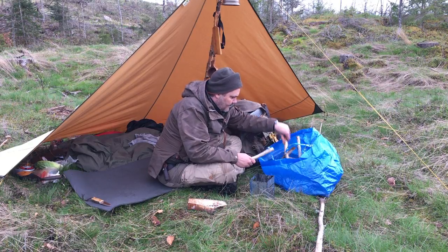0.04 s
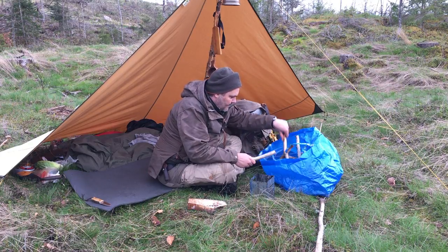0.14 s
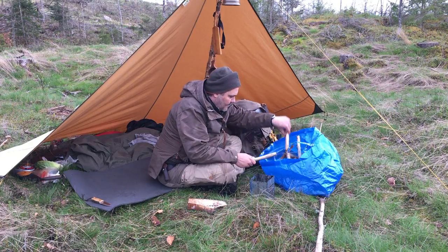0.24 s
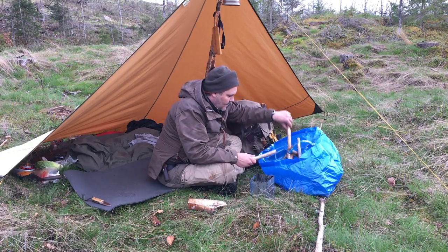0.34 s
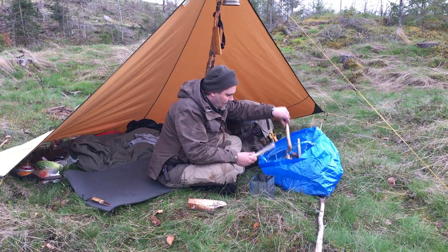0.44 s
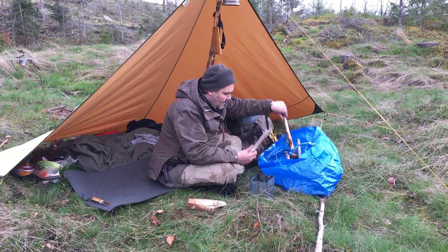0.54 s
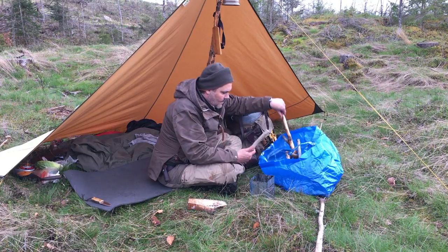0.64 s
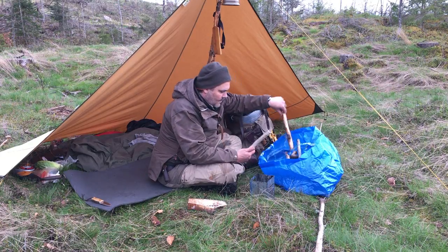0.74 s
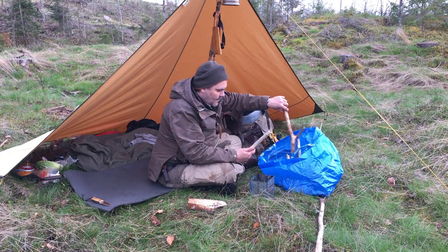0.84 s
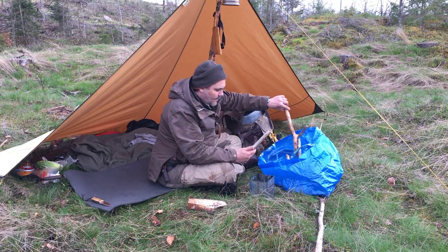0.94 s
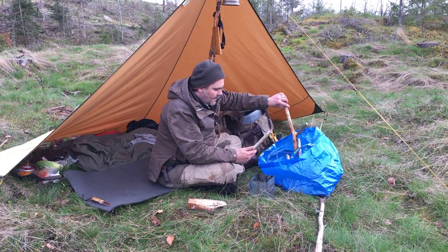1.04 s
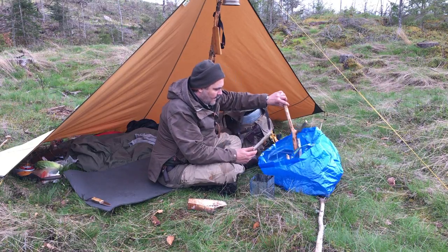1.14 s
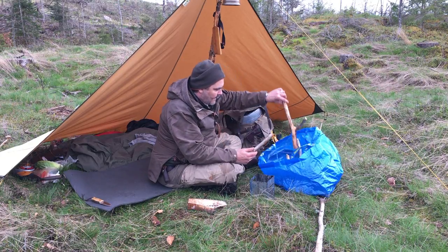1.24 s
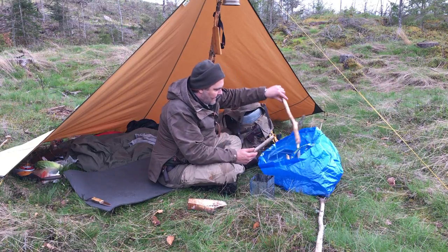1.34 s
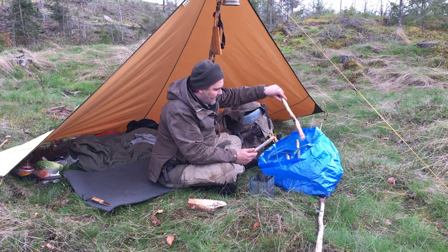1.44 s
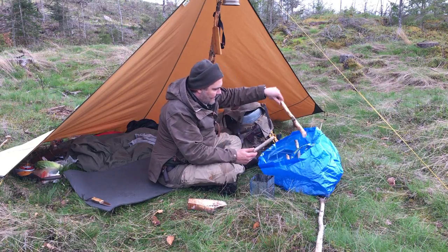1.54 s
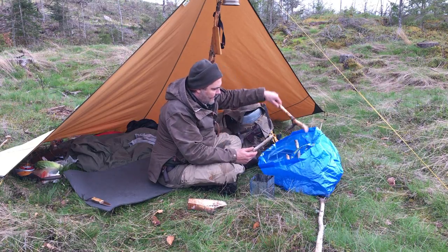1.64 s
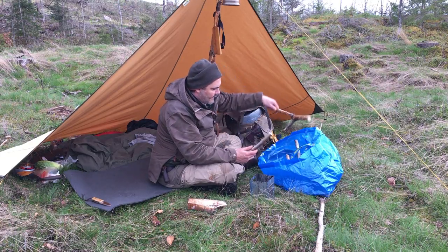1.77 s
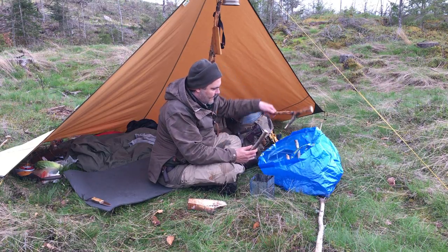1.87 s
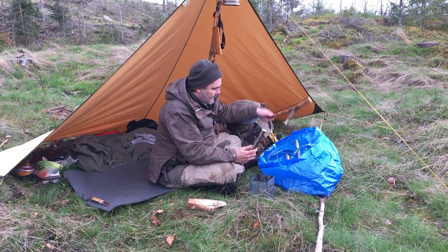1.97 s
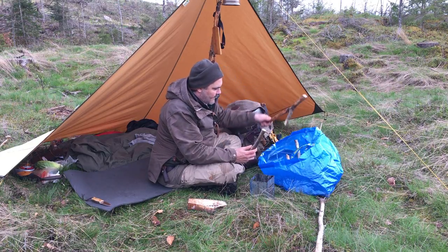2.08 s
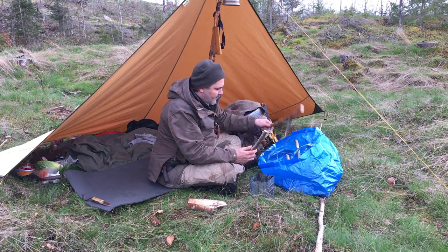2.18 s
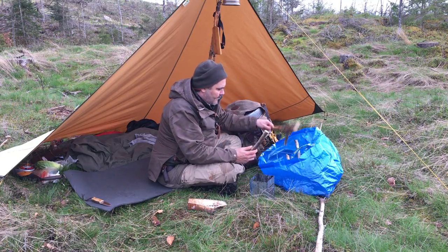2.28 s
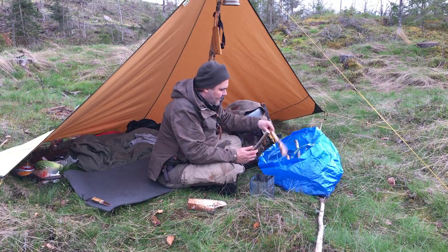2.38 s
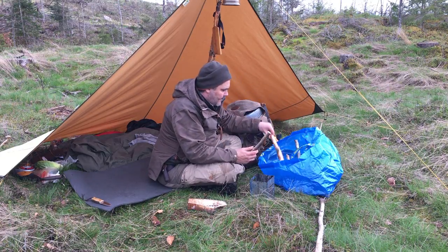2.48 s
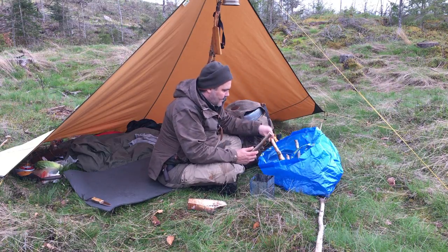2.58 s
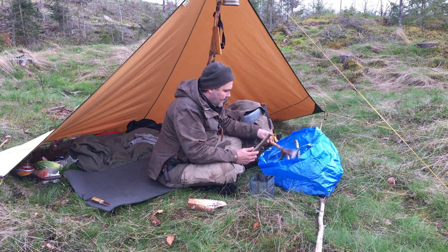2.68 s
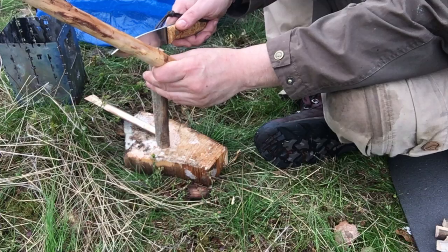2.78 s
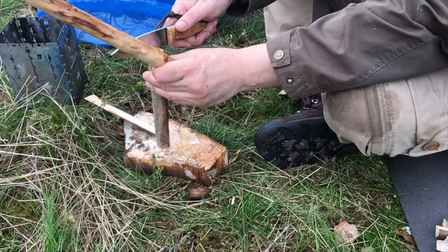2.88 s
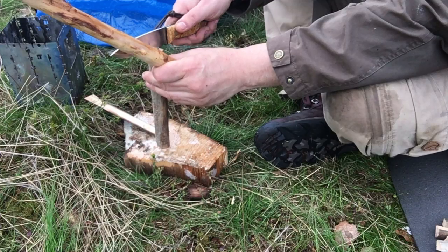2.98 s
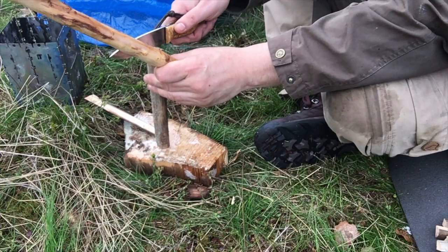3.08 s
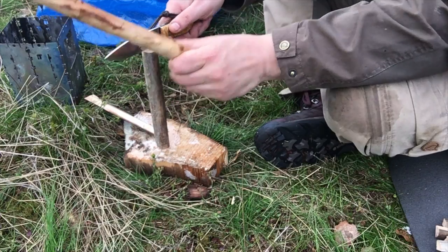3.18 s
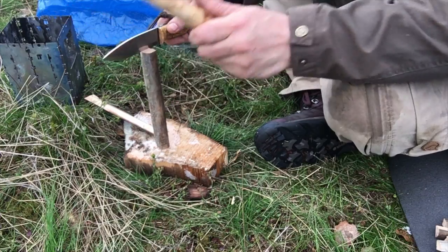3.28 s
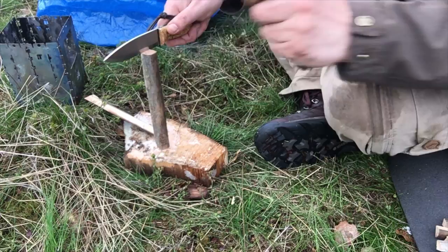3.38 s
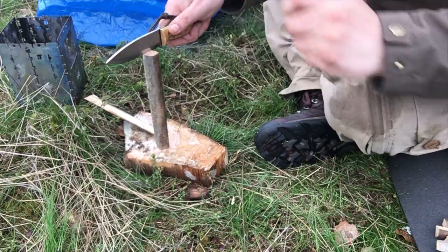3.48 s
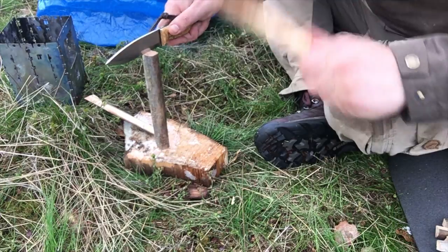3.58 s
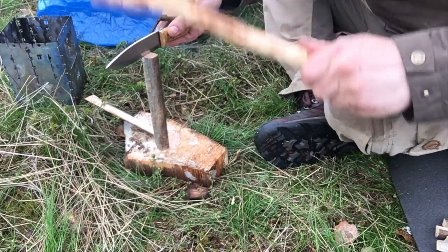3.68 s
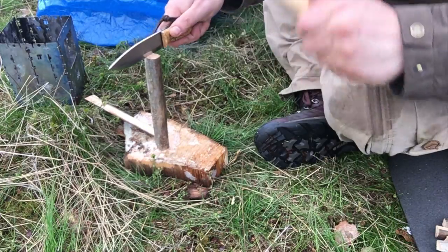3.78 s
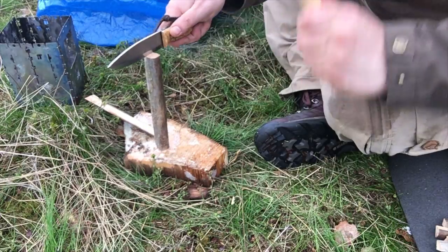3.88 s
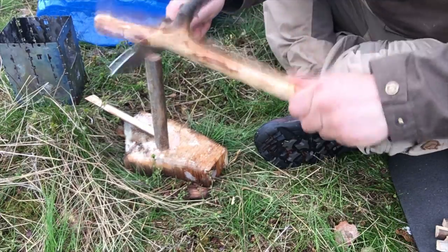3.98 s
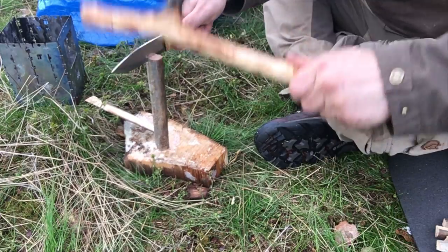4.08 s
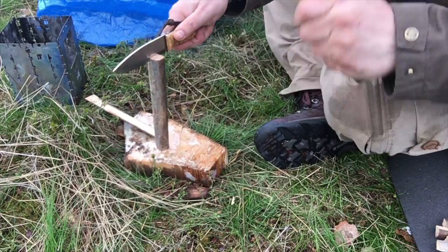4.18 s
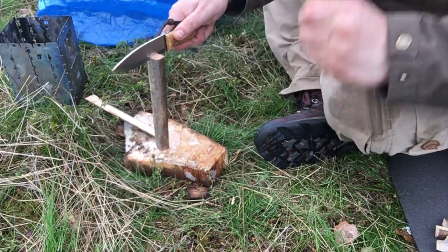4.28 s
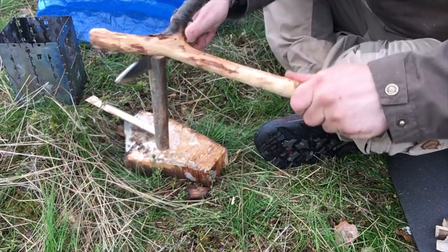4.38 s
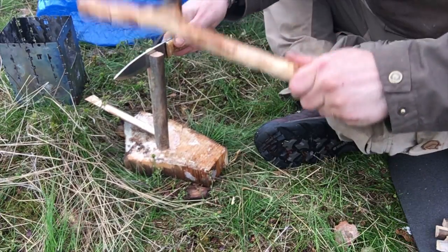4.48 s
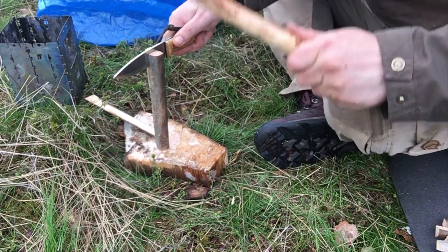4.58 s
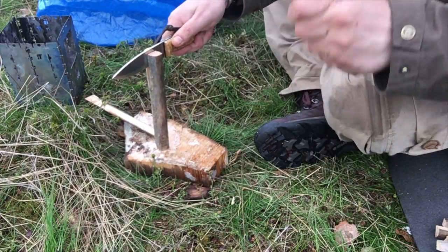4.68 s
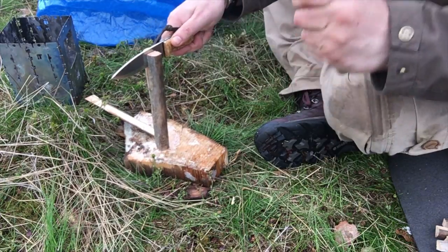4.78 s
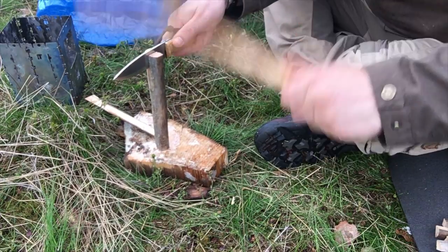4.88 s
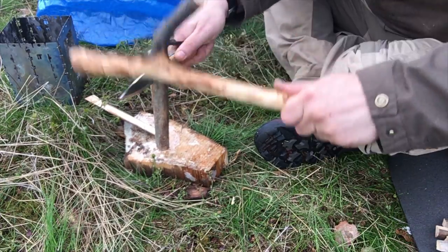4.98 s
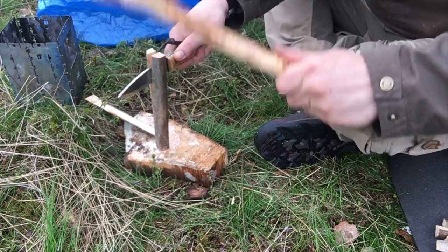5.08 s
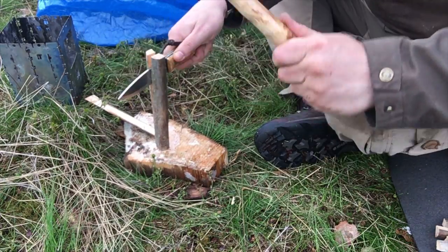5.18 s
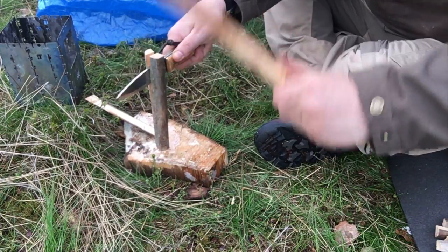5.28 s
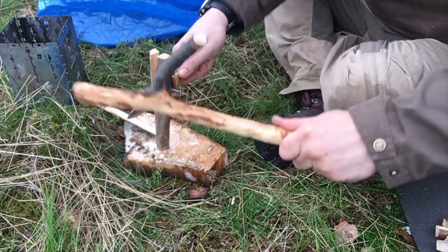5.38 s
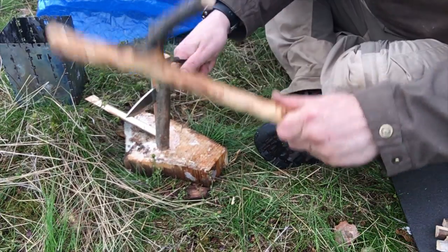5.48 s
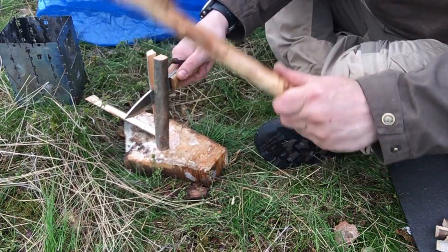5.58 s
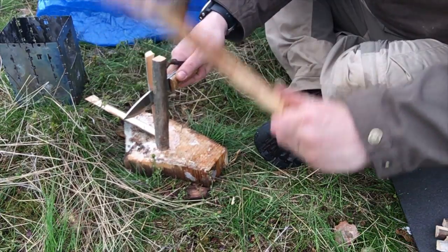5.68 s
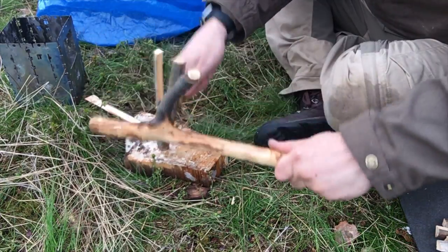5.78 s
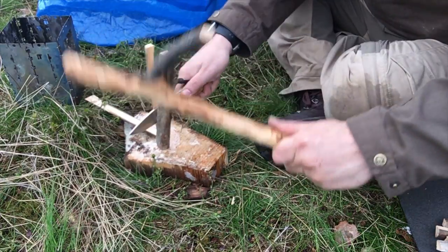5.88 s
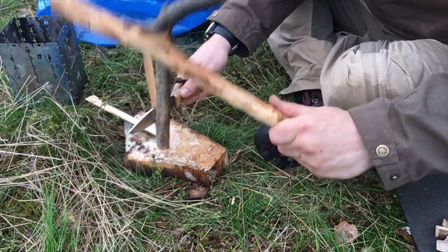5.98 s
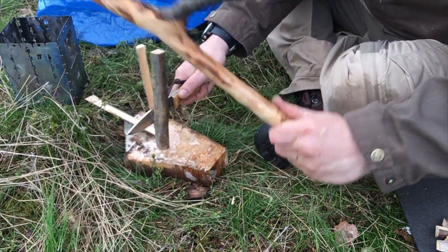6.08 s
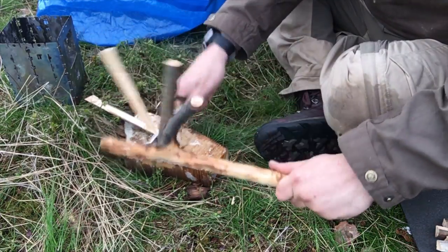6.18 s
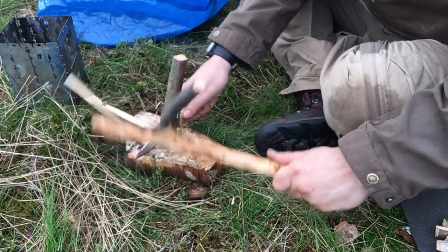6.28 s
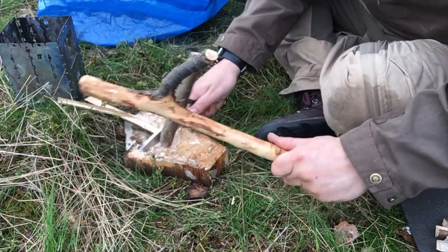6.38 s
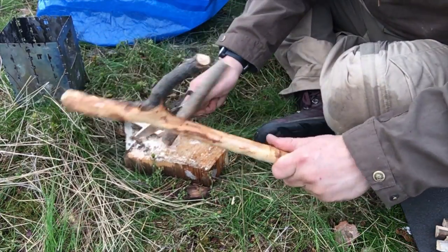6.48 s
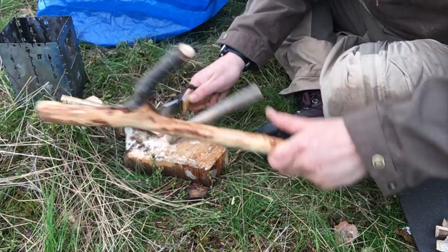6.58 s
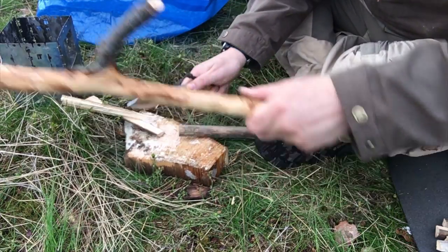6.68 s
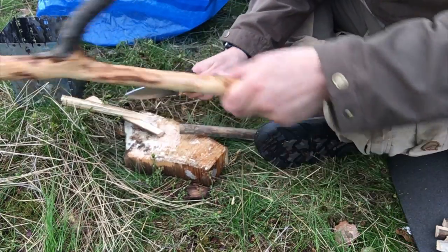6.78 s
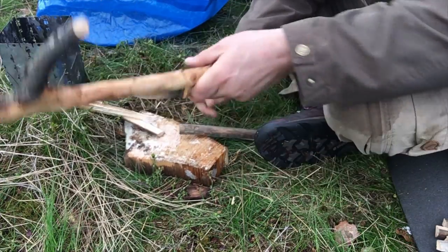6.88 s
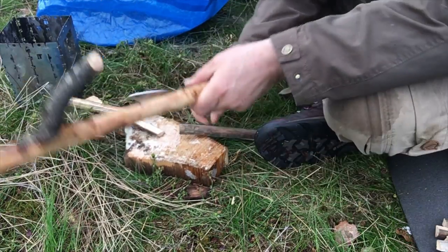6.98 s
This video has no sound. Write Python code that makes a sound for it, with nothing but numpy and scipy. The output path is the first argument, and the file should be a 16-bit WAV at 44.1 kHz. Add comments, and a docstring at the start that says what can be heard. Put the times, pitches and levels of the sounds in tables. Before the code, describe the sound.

Faint distant rummaging in twigs, a sudden cut to near quiet, then seven hard wooden knocks with cracking fibres and a final splitting tear.

```python
"""Outdoors in a light wind, someone rummages among dry twigs on a plastic sheet, heard from afar. Then the scene
cuts to close up: a wooden club drives a knife down a stick that stands on a block. Noise makes the wind, the
swishing sleeve and the whoosh of the club; random clicks make the twigs and snapping fibres; dying sines make the
knocks of the wood, the hopping block, the squeaking and ringing blade and the pieces of wood that drop."""
import sys
import numpy as np
from scipy import signal
from scipy.fft import rfft, irfft
from scipy.io import wavfile
from scipy.ndimage import uniform_filter1d

SR = 44100
rng = np.random.default_rng(int(sys.argv[2]) if len(sys.argv) > 2 else 0)


def dump(signal):
    """Clip the signal to [-1, 1] and save it as 16-bit WAV at the path in sys.argv[1]."""
    limited = np.clip(np.atleast_2d(signal).T, -1, 1)
    pcm = np.round(limited * 32767).astype(np.int16)
    wavfile.write(sys.argv[1], SR, pcm)


N = 310155

# blows of the club: start [t/s], low, middle, bright and top wood [four columns, level/dB],
# crack before its trim [level/dB], main low mode [f/Hz], middle pitch [factor], main bright mode [f/Hz],
# ring length [factor], drop back on the block [level/dB against the knock]
BLOWS = [(3.6457, 0.5, -0.5, -7.5, -3, -18.5, 675, 0.876, 2280, 0.88, -20.5),
         (4.03, 5.5, 2, 2, 2, -7, 697, 0.904, 2349, 0.71, -21.5),
         (4.4058, -0.5, 1, 4, 3.5, -6.5, 649, 1, 2340, 0.74, -22),
         (4.9663, -3.5, 0, 5, -3, -7, 676, 0.99, 2560, 0.73, -17.5),
         (5.3718, -4, -1.5, 3.5, -2, -11.5, 738, 1, 2520, 0.71, -8.5),
         (5.7899, -5, -3, -0.5, -0.5, -11, 736.3, 0.9, 2330, 0.89, -10),
         (6.2014, -7.5, -6, -3, 0, -11.5, 736, 0.86, 2427, 0.74, -12.5)]


def gain_of(db):
    """Turns decibels into an amplitude factor."""
    return 10 ** (np.asarray(db) / 20)


def evened(x):
    """Scales a sound to rms 1, so that a level in dB can be set afterwards."""
    return x / np.sqrt(np.mean(x ** 2) + 1e-20)


def peaked(x):
    """Scales a sound to peak 1."""
    return x / (abs(x).max() + 1e-20)


def read(points, hz):
    """Reads a spectrum table at the given frequencies, with straight lines over log frequency."""
    f, value = np.transpose(points)
    return np.interp(np.log(hz + 1), np.log(f + 1), value)


def follow(rows):
    """Gives the columns of a curve at every sample, and a gate that is 1 while the curve lasts."""
    s, *columns = np.transpose(rows)
    t = np.arange(N) / SR
    gate = uniform_filter1d(1. * (t > s[0]) * (t < s[-1]), size=300)
    return gate, *(np.interp(t, s, c) for c in columns)


def add(mix, s, sound):
    """Mixes a sound in, starting at s seconds."""
    part = mix[round(s * SR):][:len(sound)]
    part += sound[:len(part)]


def colour(x, points):
    """Shapes the spectrum of x by a table and evens the result."""
    gain = gain_of(read(points, np.fft.rfftfreq(len(x), 1 / SR)))
    return evened(irfft(rfft(x) * gain, len(x)))


def band(x, lo_hz, hi_hz):
    """Keeps the sound between two frequencies, with gentle edges."""
    edges = np.clip([lo_hz, hi_hz], 1, SR / 2.1)
    return signal.sosfilt(signal.butter(2, edges, "bandpass", fs=SR, output="sos"), x)


def parted(x, hz):
    """Splits x into the parts under and over hz, which sum to x."""
    low = signal.sosfiltfilt(signal.butter(2, min(hz, SR / 2.1), fs=SR, output="sos"), x)
    return low, x - low


def ring(modes, pitch, seconds=.2, lasting=1):
    """Sums dying sines, the tones of a solid body after a sudden push."""
    hz, db, t60 = np.transpose(modes)[:, :, None]
    t = np.arange(round(seconds * SR)) / SR
    fade = gain_of(db - 60 * t / np.maximum(t60 * lasting, .001))
    return (fade * np.sin(2 * np.pi * hz * pitch * t)).sum(0)


def crackle(count, per_s, spread_db):
    """Makes sparse clicks of random sign, many small and a few large, over a little noise."""
    chance, size, noise = rng.random(count), rng.exponential(1, count), rng.standard_normal(count)
    clicks = (chance < per_s / SR) * gain_of(spread_db * np.minimum(size, 4)) * np.sign(noise)
    return evened(clicks + 0.25 * noise)


def air():
    """Wind in the grass is a soft wash, with microphone hiss above it; both change colour from far to near."""
    # colour of the air from afar: [f/Hz], strength per Hz [level/dB]
    far_colour = [(59, -36), (100, 1.5), (129, -5), (448, -3.5), (642, -4), (827, -5.5), (2230, -17),
                  (2480, -20.5), (4580, -26), (15600, -30)]
    # colour of the air close up: [f/Hz], strength per Hz [level/dB]
    near_colour = [(59, -34.5), (100, -14.5), (387, -12.5), (478, -13), (793, -12.5), (863, -13),
                   (1530, -14.5), (1660, -14.5), (2590, -13.5), (15600, -18)]
    # how loud the air is: time [t/s], wash [level/dB], hiss [level/dB]
    air_levels = [(0, -54.5, -62.5), (0.9, -62, -68.5), (1.15, -64.5, -70), (2.0, -65, -69.5),
                  (2.2, -66.5, -72.5), (2.65, -66.5, -68), (2.81, -65.5, -67), (2.83, -75.5, -80.5),
                  (3.1, -75, -74), (3.36, -67.5, -65), (3.89, -71, -63), (4.1, -70, -66),
                  (4.62, -71, -67.5), (4.8, -72, -70), (4.95, -73, -72), (5.07, -68, -66),
                  (5.62, -71.5, -68), (5.85, -65, -63.5), (6.08, -70, -67.5), (6.4, -65, -63),
                  (7.03, -66, -70)]
    near_from_s = 2.82  # the scene cuts from far to near
    _, wash_db, hiss_db = follow(air_levels)
    far_wash, far_hiss = parted(colour(rng.standard_normal(N), far_colour), 1830)
    near_wash, near_hiss = parted(colour(rng.standard_normal(N), near_colour), 2500)
    is_far = np.arange(N) < near_from_s * SR
    wash = np.where(is_far, evened(far_wash), evened(near_wash))
    hiss = np.where(is_far, evened(far_hiss), evened(near_hiss))
    return gain_of(wash_db) * wash + gain_of(hiss_db) * hiss


def ground_shake():
    """Each blow shakes the ground under the microphone: a deep rumble that fades for half a second."""
    start_db, t60_s = -46.5, 0.99
    strength = np.zeros(N)
    for s, *_ in BLOWS:
        add(strength, s, gain_of(start_db - 60 * np.arange(SR // 2) / SR / t60_s))
    return strength * evened(band(band(rng.standard_normal(N), 28, 70), 16, 95))


def gusts():
    """Eddies push the microphone's diaphragm: a slow sway, a lumpy rumble and a flutter on its peaks."""
    # slow pressure sway: time [t/s], sway [level/dB]
    sway_levels = [(0.03, -13), (0.36, -27), (0.6, -41), (1.86, -46), (2.39, -37), (2.6, -38.5),
                   (2.97, -60), (7.03, -57.5)]
    # wind on the microphone: time [t/s], rumble [level/dB], flutter against the rumble [level/dB]
    gust_levels = [(0.0, -23.5, -28), (0.07, -51, -19), (0.4, -64, -1.5), (1.5, -66, -12.5),
                   (2.75, -61.5, -14.5), (2.97, -69.5, -12), (3.07, -40.5, -47), (3.19, -47, -45),
                   (3.3, -42.5, -37.5), (3.46, -37, -22), (3.56, -70, -26), (3.63, -35.5, -15),
                   (3.75, -43.5, -26), (3.8, -30.5, -29), (3.9, -31, -12.5), (4.18, -44.5, -28),
                   (4.23, -35, -33.5), (4.45, -45.5, -19.5), (4.65, -61.5, -16.5), (5.65, -65, -10),
                   (5.75, -37, -17.5), (5.83, -45.5, -19), (5.95, -61, -17.5), (6.64, -57, -21.5),
                   (6.84, -36, -27.5), (6.93, -32, -5), (7.03, -43, -9.5)]
    upper_db, upper_share = 5.5, 0.55  # the upper rumble follows this share of the flutter's dB
    sway_db = uniform_filter1d(follow(sway_levels)[1], size=4000)
    _, rumble_db, flutter_db = follow(gust_levels)
    a, b, c, d = rng.standard_normal((4, N))
    lumps = gain_of(2 * evened(band(d, 3.8, 24)))  # slow random swelling
    sway = evened(band(band(a, 2.2, 5), 1.3, 20))
    rumble = evened(band(band(b, 19, 63), 11, 73) * lumps)
    upper = evened(band(band(b, 55, 88), 45, 120) * lumps)
    flutter = evened(band(band(c, 87, 190), 60, 300) * lumps ** 2)
    wind = rumble + gain_of(upper_db + upper_share * flutter_db) * upper + gain_of(flutter_db) * flutter
    return gain_of(sway_db) * sway + gain_of(rumble_db) * wind


def twigs(x, treble_db, hz, tone_db):
    """Colours crackle as twigs on plastic: a woody body that favours one pitch, and a treble part."""
    # colour of twigs on plastic: [f/Hz], strength per Hz [level/dB]
    twig_colour = [(59, -38.5), (100, -13), (219, -3), (302, -11), (433, -5.5), (662, -15.5), (768, -12),
                   (1030, -16.5), (2270, -14), (6150, -13), (8110, -9.5), (10200, -23.5), (12900, -17),
                   (16000, -30.5)]
    body, treble = parted(colour(x, twig_colour), 3180)
    body = evened(body) + gain_of(tone_db) * evened(band(body, hz / 1.32, hz * 1.66))
    return evened(body) + gain_of(treble_db) * evened(treble)


def rummage():
    """A hand stirs twigs and plastic: a bed of fine crackle under short, dying clumps of louder snaps."""
    # the bed: time [t/s], level before the trim [level/dB], treble against the body [level/dB]
    bed_levels = [(0.012, -41, -26), (0.085, -50, -14.5), (0.144, -26, -17.5), (0.19, -43.5, -9),
                  (0.26, -36.5, -5.5), (0.34, -44.5, -18.5), (0.48, -57, -9), (0.58, -55, -8),
                  (0.63, -37.5, -19), (0.72, -53.5, -7.5), (0.78, -53, -4.5), (0.89, -54.5, -36),
                  (0.964, -39.5, -10.5), (1.014, -60.5, -13), (1.5, -60, -15)]
    # the clumps: start [t/s], level before the trim [level/dB], treble against the body [level/dB],
    # time to fade by 60 dB [t/s], favoured pitch [f/Hz]
    clumps = [(0.017, -27.5, -9, 0.02, 1390), (0.109, -29.5, -27.5, 0.095, 1470),
              (0.136, -21.5, -9.5, 0.04, 1510), (0.16, -36, -29, 0.16, 2200), (0.234, -49, 4, 0.13, 714),
              (0.308, -36.5, -12.5, 0.161, 920), (0.36, -52.5, 7.5, 0.033, 603),
              (0.43, -35.5, -7.5, 0.049, 960), (0.499, -33, -20, 0.0696, 1400),
              (0.53, -32.5, -38.5, 0.024, 953), (0.588, -41, -25.5, 0.019, 727),
              (0.609, -31.5, -16.5, 0.084, 1870), (0.621, -23, -9.5, 0.028, 790),
              (0.631, -27, -20.5, 0.02, 1120), (0.66, -29, -6, 0.06, 1480), (0.676, -23.5, -21, 0.024, 593),
              (0.706, -31.5, -19, 0.031, 760), (0.746, -42, -7.5, 0.13, 1280),
              (0.777, -30, -6, 0.034, 1060), (0.813, -39.5, -32, 0.054, 906),
              (0.859, -29.5, -42.5, 0.017, 824), (0.88, -44.5, -32, 0.054, 974),
              (0.914, -35, -36, 0.1, 840), (0.944, -29, -43, 0.15, 730), (1.025, -37, -15, 0.0236, 587),
              (1.155, -34.5, -26.5, 0.015, 720), (1.168, -43.5, -5, 0.0293, 4200),
              (1.192, -43.5, -28, 0.026, 1350), (1.386, -41, -17.5, 0.0435, 1035),
              (2.493, -51, 1.5, 0.05, 2030), (2.501, -40.5, -7, 0.036, 1440)]
    bed_trim_db, clump_trim_db = -7.5, -6
    clump_rise_s = 0.000281
    gate, bed_db, bed_treble_db = follow(bed_levels)
    bed = twigs(crackle(N, per_s=1600, spread_db=6), bed_treble_db, 970, tone_db=-27.0)
    out = gate * gain_of(bed_db + bed_trim_db) * bed
    t = np.arange(4096) / SR
    for s, db, treble_db, t60, hz in clumps:
        clump = twigs(crackle(4096, per_s=1500, spread_db=3), treble_db, hz, tone_db=0.5)
        fade = gain_of(db + clump_trim_db - 60 * t / max(t60, .004))
        add(out, s, fade * np.minimum(t / clump_rise_s, 1) * clump)
    return out


def sleeve():
    """Cloth slides on cloth and air whooshes round the club; both swell with the speed of the arm."""
    # moves of arm and club: fastest moment [t/s], build-up [t/s], dying away [t/s],
    # sleeve before its tilt [level/dB], whoosh [level/dB]
    moves = [(3.365, 0.26, 0.06, -52, -87.5), (4.005, 0.1, .03, -56.5, -64), (4.38, .06, .02, -58.5, -72.5),
             (4.939, 0.031, 0.038, -61.5, -72), (5.341, 0.137, 0.12, -60, -60.5),
             (5.5, 0.12, .15, -62.5, -70), (5.761, 0.14, 0.039, -56.5, -62), (5.95, .15, 0.067, -65, -75),
             (6.17, 0.12, 0.12, -57, -62.5), (6.64, 0.13, 0.13, -59, -67.5),
             (6.97, 0.33, 0.99, -51.5, -58.5)]
    # colour of the cloth: [f/Hz], strength per Hz [level/dB]
    cloth_colour = [(240, -42.5), (400, -17.5), (958, -2.5), (1120, -10), (1490, 0.5), (1610, -2.5),
                    (4240, -6.5), (15600, -15.5)]
    swell_db, tilt_db = 23, 1  # swell over the build-up; treble raised and the rest lowered by the tilt
    top_hz, wobble_hz = 880, 160  # whoosh pitch at full speed; how fast it wobbles at most
    climb = 0.31  # share of the top pitch climbed during the build-up
    low, high = parted(colour(rng.standard_normal(N), cloth_colour), 2800)
    cloth = low / gain_of(tilt_db) + high * gain_of(tilt_db)
    a, b = rng.standard_normal((2, N))
    # a slow random wobble, carried up to the whoosh pitch, is a narrow band of noise
    wobble = parted(a, wobble_hz)[0] + 1j * parted(b, wobble_hz)[0]
    wobble = wobble / np.std(wobble.real)
    out = np.zeros(N)
    t = np.arange(N) / SR
    for s, rise_s, fall_s, sleeve_db, whoosh_db in moves:
        before = (s - t) / max(rise_s, .01)
        after = (t - s) / max(fall_s, .01)
        swell = gain_of(-swell_db * np.minimum(np.maximum(before, after), 5))
        hz = top_hz * (1 - climb * np.clip(before, 0, 2))
        whoosh = (wobble * np.exp(2j * np.pi * np.cumsum(hz) / SR)).real
        out += swell * (gain_of(sleeve_db) * cloth + gain_of(whoosh_db) * whoosh)
    return out


def drops():
    """Pieces of wood drop on soft ground, one just before the last tear: short rings without bass or high treble."""
    # drops: start [t/s], peak [level/dB], pitch [factor], ring length [factor]
    drop_times = [(6.261, -25, 1.07, 0.55), (6.479, -50.5, 1.2, 0.84), (6.662, -29, 0.966, 0.944)]
    # a piece of wood before those factors: [f/Hz], strength [level/dB], time to fade by 60 dB [t/s]
    piece_modes = [(459, -3.5, 0.066), (670, 16.5, 0.0128), (933, -1.5, 0.0716), (1300, -3.5, 0.039),
                   (2970, -4, 0.015)]
    out = np.zeros(N)
    for s, db, pitch, lasting in drop_times:
        wood = ring(piece_modes, pitch, lasting=lasting)
        add(out, s, gain_of(db) * peaked(band(wood, 410, 4650)))
    return out


def hops():
    """The block rocks at a blow, hops, lands and bounces once; each contact rings its wood."""
    # hops: take-off [t/s], take-off peak [level/dB], flight [t/s], landing peak [level/dB]
    hop_times = [(3.667, -41, .08, -38), (4.054, -41, .1015, -35), (4.427, -41, .093, -38),
                 (4.99, -44, .047, -45), (5.395, -40, .057, -45)]
    # block before the filters: [f/Hz], strength [level/dB], time to fade by 60 dB [t/s]
    block_modes = [(626, -9, .17), (950, 0, .012), (1300, -1, .01), (1740, -13, .05), (2400, -12, .005)]
    contact_s = .00045  # the block lands softly on turf, which rounds off the push
    bounce_share, bounce_db = .53, -12  # flight and level of the bounce against the first hop
    push = np.hanning(round(contact_s * SR))
    landing = peaked(band(np.convolve(ring(block_modes, 1, seconds=.3), push), 520, 6000))
    out = np.zeros(N)
    for s, off_db, flight_s, db in hop_times:
        add(out, s, gain_of(off_db) * landing)
        add(out, s + flight_s, gain_of(db) * landing)
        add(out, s + flight_s * (1 + bounce_share), gain_of(db + bounce_db) * landing)
    return out


def squeaks():
    """The pinched blade squeaks: each squeak is one short dying sine."""
    # squeaks: start [t/s], strength [level/dB], pitch before the factor below [f/Hz],
    # time to fade by 60 dB [t/s]
    squeak_times = [(4.9734, -21.5, 4866, 0.026), (4.9818, -25, 4750, 0.02), (5.3896, -32, 4480, 0.0137),
                    (5.3951, -15.5, 4460, 0.016), (6.215, -38, 6700, 0.02), (6.2214, -34, 4700, 0.019)]
    out = np.zeros(N)
    for s, db, hz, t60 in squeak_times:
        add(out, s, ring([(hz, db, t60)], pitch=0.9905))
    return out


def burst(db, t60, low_db):
    """Breaking fibres crack sharply: dense clicks that die quickly over a fainter tail."""
    trim_db = -7.5
    t = np.arange(4096) / SR
    clicks = crackle(4096, per_s=13000, spread_db=5.0)
    treble = evened(band(clicks, 4000, 17000))
    lower = evened(band(clicks, 1700, 3100))
    fade = gain_of(-60 * t / max(t60, .003)) + gain_of(-14.5 - 60 * t / .06)
    return gain_of(db + trim_db) * fade * (treble + gain_of(low_db) * lower)


def snaps():
    """Fibres snap along the blade, each with a crack of its own."""
    # snaps: start [t/s], treble before the trim [level/dB], lower part against the treble [level/dB]
    snap_times = [(3.6674, -48, 4.5), (4.057, -32, -19), (4.426, -29.5, -21), (4.445, -21, -28.5),
                  (4.5363, -39, -32), (4.9677, -10.5, 3.5), (4.974, -17, -1.5), (4.9818, -23, -13.5),
                  (5.043, -48, 9.5), (5.3905, -22, -11), (5.395, -15.5, -10.5), (5.456, -47, 6.5),
                  (5.46, -45, 5.5), (5.7943, -15.5, 1.5), (5.804, -24.5, 4), (5.807, -25, -8),
                  (5.81, -23, -5), (6.2066, -20.5, 1.5), (6.209, -17, -19.5), (6.2135, -8, -16),
                  (6.219, -24, -7.5), (6.2282, -26, -2), (6.2446, -36, -5)]
    out = np.zeros(N)
    for s, db, low_db in snap_times:
        add(out, s, burst(db, t60=0.011, low_db=low_db))
    return out


def split():
    """The last fibres tear in a dense crackle, which leaves the blade ringing."""
    # colour of the tear: [f/Hz], strength per Hz [level/dB]
    tear_colour = [(180, -51), (300, -27.5), (1270, -10), (1740, -17), (2480, -8.5), (4610, -7),
                   (5460, -8.5), (10500, -7.5), (14400, -2), (16500, -5.5)]
    # ringing blade: [f/Hz], strength [level/dB], time to fade by 60 dB [t/s]
    blade_modes = [(5561, -60, .75), (6901, -63, .4), (11700, -63, .35), (12640, -58, .3),
                   (12812, -58, .45), (13070, -66, .4)]
    start_s, rise_s, hold_s = 6.326, 0.00196, 0.0042  # the hold counts from the start
    level_db, fall_db_per_s = -19.5, 650
    t = np.arange(N) / SR - start_s
    fade = gain_of(level_db - fall_db_per_s * np.clip(t - hold_s, 0, .5))
    fibres = crackle(N, per_s=12000, spread_db=1.5)
    out = np.clip(t / rise_s, 0, 1) * fade * colour(fibres, tear_colour)
    add(out, start_s, ring(blade_modes, 1, seconds=0.6))
    return out


def blow(low_db, middle_db, bright_db, top_db, crack_db, deep_hz, middle_pitch, bright_hz, lasting, rebound_db):
    """A short push rings the wood, twice more as the parts chatter; ground and legs scatter it into a tail."""
    # club, stick and block as four groups of modes, low to high, before the factors of the blow:
    # [f/Hz], strength within the group [level/dB], time to fade by 60 dB [t/s]
    wood_modes = [
        [(223.53, -15.5, 0.026), (475.7, -13, 0.049), (671.4, 1, 0.017), (833, 2, 0.014), (969.2, -8, 0.024)],
        [(1242, -2, 0.014), (1397, 5.5, 0.015), (1520, -9.5, 0.031), (1995, 1, 0.023)],
        [(2180, -12, 0.045), (2404.6, 5, 0.015), (2592, -6, 0.024)],
        [(3120, -1.5, 0.014), (3460, 1, .014), (4137, -1, 0.016), (4884, -5.5, 0.018), (5490, -8, 0.013)],
    ]
    table_deep_hz, table_bright_hz = 680, 2400  # main modes of the first and third group
    retouch_s, retouch_db = 0.0013058, -12  # the blade chatters in the cut
    rebound_s = .0075  # the stick drops back on the block
    pitches = deep_hz / table_deep_hz, middle_pitch, bright_hz / table_bright_hz, 1
    levels = low_db, middle_db, bright_db, top_db
    low, middle, bright, top = (gain_of(db) * peaked(ring(modes, pitch, lasting=lasting))
                                for db, modes, pitch in zip(levels, wood_modes, pitches))
    rise = 1 - np.exp(-np.arange(len(low)) / SR / 0.00019)  # the force builds while the wood dents
    knock = rise * (low + middle + bright + top)
    out = knock.copy()
    add(out, retouch_s, gain_of(retouch_db) * knock)
    add(out, rebound_s, gain_of(rebound_db) * rise * (low + middle))
    t = np.arange(2048) / SR
    scatter = rng.standard_normal(2048) * gain_of(-60 * t / 0.037) * (t > .002)
    tail = signal.oaconvolve(knock, scatter / np.linalg.norm(scatter))[:len(out)]
    add(out, 0, gain_of(-14.5) * tail)
    out = band(band(out, 200, 20000), 200, 20000)  # the knock keeps nothing below about 200 Hz
    add(out, 0, burst(crack_db, t60=.016, low_db=-12.5))
    return out


def blows():
    """The club strikes the knife again and again, each time with its own pitch and strength."""
    out = np.zeros(N)
    for s, *how in BLOWS:
        add(out, s, blow(*how))
    return out


def scene():
    """Adds all sources at one microphone."""
    background = air() + gusts() + ground_shake() + rummage() + sleeve()
    stick_and_block = drops() + hops() + squeaks() + snaps() + split()
    mix = background + stick_and_block + blows()
    return mix[None]


def record(dry):
    """The hardest blows overload the input, which clips them; then a filter takes off the highest treble."""
    edge_hz = 16000
    clipped = np.clip(dry, -.97, .97)
    low_pass = signal.firwin(255, edge_hz, window=("kaiser", 9), fs=SR)
    return signal.oaconvolve(clipped, low_pass[None], "same")


dry = scene()
out = record(dry)
dump(out)
```